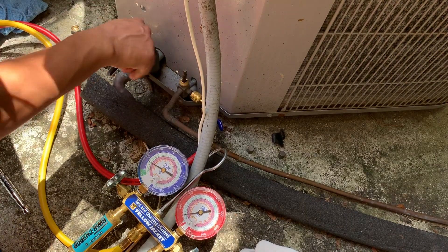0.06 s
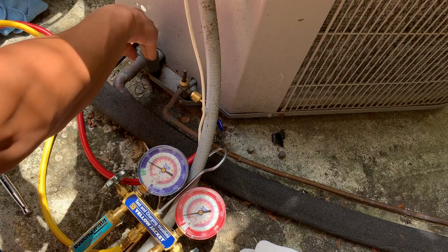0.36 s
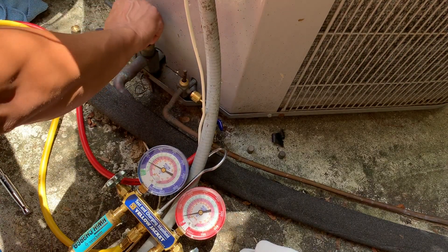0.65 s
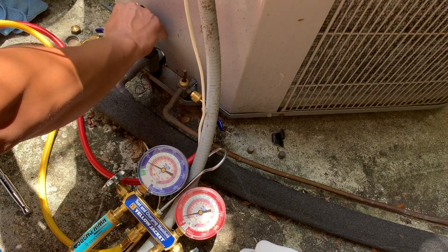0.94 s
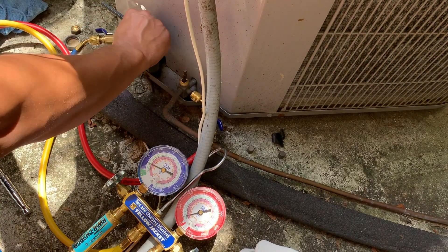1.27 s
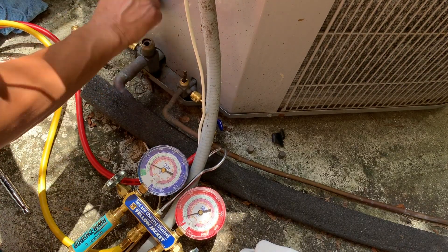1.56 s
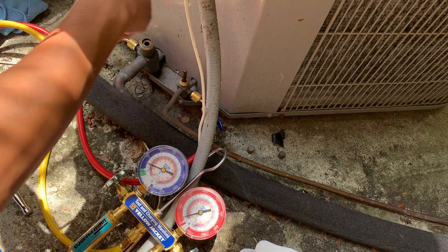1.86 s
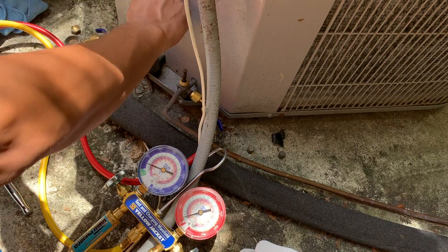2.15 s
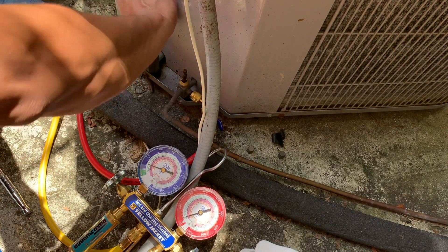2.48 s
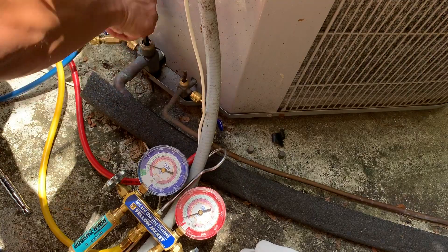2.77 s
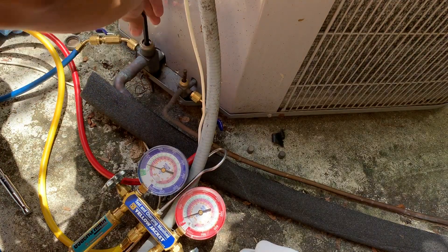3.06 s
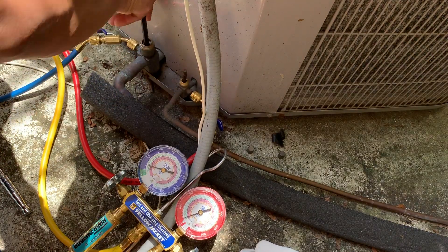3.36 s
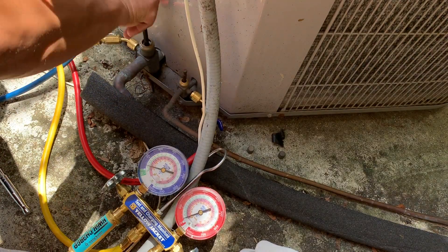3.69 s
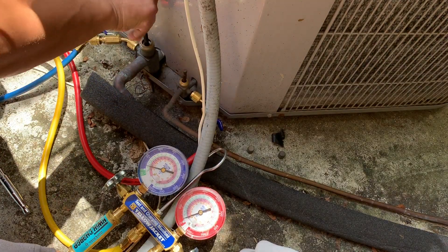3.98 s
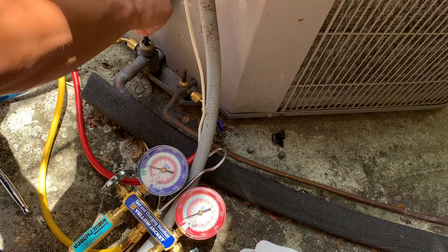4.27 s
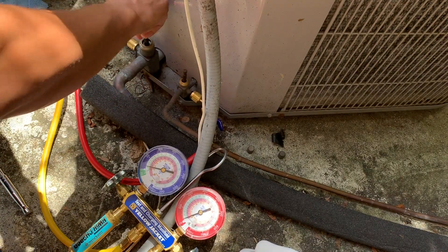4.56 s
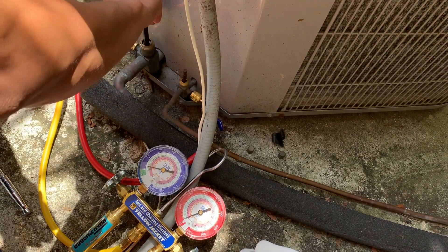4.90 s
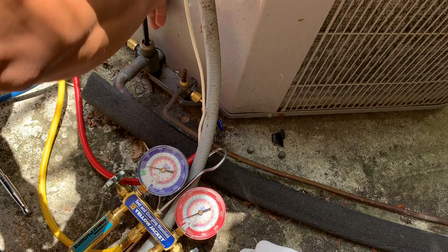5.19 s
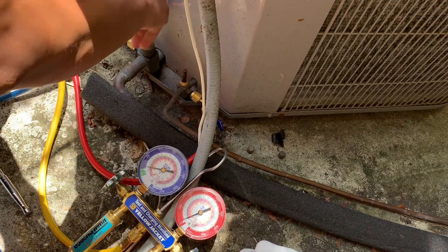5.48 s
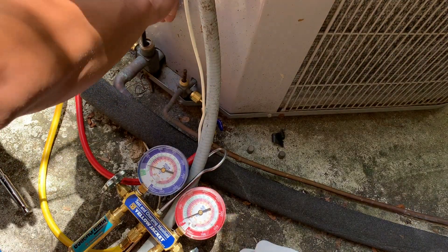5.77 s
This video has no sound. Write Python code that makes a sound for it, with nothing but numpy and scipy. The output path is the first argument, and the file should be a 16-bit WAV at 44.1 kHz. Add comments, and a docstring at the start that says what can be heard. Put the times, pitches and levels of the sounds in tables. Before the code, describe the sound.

Heard from just above its valves, an outdoor air conditioner runs with a buzzing compressor drone, a low fan hum, rushing air and a thin refrigerant hiss. A hand bumps the casing, then a metal part clanks sharply against it. Later a tool scrapes briefly and a soft thud follows. The drone carries on until all sound suddenly stops.

```python
"""The compressor of an outdoor air conditioner drones, heard from just above the service valves.
It knocks several times a turn; this periodic forcing gives harmonics that beat against the fan's tones.
Turbulent air rushes, the motor hums, and refrigerant hisses and sets the pipes ringing.
A hand at the valves bumps the casing, clanks a metal part against it and scrapes a tool.
Near the end all sound stops dead."""
import sys
import numpy as np
from scipy import signal
from scipy.fft import rfft, irfft
from scipy.io import wavfile
from scipy.ndimage import uniform_filter1d, map_coordinates

SR = 44100
rng = np.random.default_rng(int(sys.argv[2]) if len(sys.argv) > 2 else 0)


def unload_audio(sound):
    """Save the sound as a 16-bit wav file, at the path given as the first command line argument."""
    columns = np.transpose(np.atleast_2d(sound))
    # keep every value between -1 and 1, then stretch to whole-number steps
    steps = np.round(np.clip(columns, -1, 1) * 32767)
    wavfile.write(sys.argv[1], SR, steps.astype(np.int16))


N = 261954
FFT_SIZE = 2 ** 18
T, FREQS = np.arange(N) / SR, np.fft.rfftfreq(FFT_SIZE, 1 / SR)

SHAFT_HZ, BLADE_HZ, MAINS_HZ, TOP_HZ = 59.063, 55.71, 60, 15800
FIRST_BLADE_S, STOP_S = .0066, 5.477
PUFF_PLACE = 0.58  # fraction of the turn at which the gas puffs

# air through coil and grille: f/Hz, spectral level/dB
AIR_SPECTRUM = [(15, -76.5), (40, -59), (90, -59), (150, -62.5), (270, -60.5), (400, -65.5), (700, -60.5),
                (1050, -64), (1300, -70), (2200, -77), (3000, -80), (6000, -91), (16000, -110)]
# fan tones: multiple of the blade rate, level/dB
BLADE_HARMONICS = [(1, -22.5), (2, -36), (3, -55), (4, -39), (5, -66.5)]
# motor hum: multiple of the mains frequency, level/dB
HUM_HARMONICS = [(2, -39), (4, -50.5), (8, -54)]
# refrigerant in the valve: f/Hz, spectral level/dB
HISS_SPECTRUM = [(1500, -89.5), (3000, -87), (4000, -82.5), (4800, -79), (5900, -83), (7200, -74.5),
                 (8400, -74), (9400, -73), (10500, -81), (12000, -82), (13700, -82.5), (15500, -84.5)]
# swell of the hiss: t/s, gain/dB
HISS_SWELL = [(0, -5), (1, -3), (2.5, -1.5), (4, -0.7), (5.5, -0.5)]
# pipe resonances: f midway/Hz, bandwidth/Hz, level/dB, glide/(Hz/s), wander/Hz
PIPE_MODES = [(3529, 42, -67.5, 0, 10), (4215, 30, -73, -8.5, 8), (4540, 60, -75, 10.5, 10),
              (5008, 100, -71, 25, 25), (5220, 90, -76, 20, 30), (5470, 70, -77, -16, 30),
              (7070, 110, -75, -1.5, 40)]
# excitation of the pipes: t/s, gain/dB
PIPE_DRIVE = [(.3, -3), (1.0, -2), (1.7, -1.5), (2.3, 1), (3.1, 1), (3.7, 1), (5.4, 2.5)]
# bumps and scuffs: t/s, level/dB, half-duration/s, centre f/Hz
HANDLING = [(3.402, -25.5, 0.018, 58), (3.396, -28, 0.027, 280), (3.432, -27.5, 0.036, 640),
            (3.43, -46, 0.039, 11000), (4.768, -32, 0.035, 111)]
# blows on the casing: t/s, ring level/dB, cut-off f/Hz, clatter level/dB, clatter T60/s
IMPACTS = [(0.7700, -12.5, 690, -32, .05), (.7785, -23, 720, -35, .05), (.795, -24, 720, -34, .1),
           (1.6087, -15.5, 16960, -13.5, .028), (1.6117, -25, 15060, -21, 0.071),
           (1.6213, -23, 11000, -21, 0.12), (1.6325, -17.5, 2100, -18, 0.05),
           (1.6365, -18.5, 2000, -19, 0.051), (1.6515, -23, 3000, -27, .1), (1.668, -27, 2000, -30, .2)]
# modes of casing and valves: f/Hz, level/dB, T60/s, build-up time/s
CASING_MODES = [(515, -7, .16, .0005), (616, -4, 0.041, .0005), (707, 1.5, 0.062, .0005),
                (826, -3.5, .06, .0005), (885, -1.5, 0.054, .0005), (945, -4, .1, .0005),
                (998, -5.5, .23, .001), (1153, -6.5, .16, .002), (1457, -2.5, 0.33, .06),
                (1530, -13, .3, .04), (1620, -8, .1, .0005), (1733, -11.5, .1, .0005),
                (1864, -8, .1, .0005), (2020, -10.5, .15, .0005), (2126, -11.5, .2, .005),
                (2530, -22, .18, .0005), (2891, -17, .33, .004), (4194, -21, .35, .002),
                (4740, -14.5, .089, .0005), (5250, -16, .1, .0005), (6260, -17, .1, .0005),
                (7150, -8.5, .13, .0005)]
# colour of the clatter: f/Hz, gain/dB
CLATTER_COLOUR = [(300, -7), (550, -2), (850, 4), (1400, -3), (1950, 1), (2600, -3), (3400, -5),
                  (5000, 1.5), (6500, .5), (15000, -1.5)]
# knocks that set the harmonics' phases: place/turn, centre f/Hz, bandwidth/Hz, weight/dB
KNOCKS = [(.68, 51, 90, 2), (.16, 640, 315, -5), (.73, 435, 303, -2), (.58, 700, 325, -3.5),
          (.14, 980, 383, -4), (.45, 1004.5, 515, 4), (.75, 940, 460, 4.5), (.24, 1533, 690, -4.5),
          (.56, 1507, 397, -1), (.12, 2100, 450, -5), (.55, 2250, 560, 1.5), (.74, 2300, 705, -3),
          (.52, 4200, 2200, -22)]
# low harmonics of the compressor shell: shaft order, relative level/dB, side minus mid/dB
SHELL_HARMONICS = [(1, -9.5, -33), (2, -26, -15.5), (3, -12, -16), (4, -17, -25.5), (5, -14.5, -32.5),
                   (6, -21.5, -18), (7, -11, -14.5), (8, -20.5, -7), (9, -16.5, -8.5), (10, -16, -10),
                   (11, -7, -15.5), (12, -11.5, -18), (13, -24.5, -6), (14, -25, -3), (15, -15, -5),
                   (16, -13, -13), (17, -15.0, -8), (18, -14, -4.5), (19, -10, -16.5), (20, -25, -0.5),
                   (21, -20, -8), (22, -29, -15.5), (23, -16.5, -12), (24, -15.0, -17), (25, -18, -13),
                   (26, -18, -1.5), (27, -24.5, 3), (28, -21.5, -5.5), (29, -33, -5), (30, -36.5, -7.5),
                   (31, -23, -19), (32, -38, 2), (33, -40, 13.5), (34, -28.5, 15), (35, -16, -4),
                   (36, -19, 1.5), (37, -16.5, -11), (38, -21, 0.5), (39, -27, 8.5), (40, -30.5, -3),
                   (41, -26, -5), (42, -19.5, -16.5), (43, -26, -6), (44, -34, 5), (45, -32.5, -7),
                   (46, -29.5, -3), (47, -42, 13), (48, -38, 15), (49, -32, 10.5), (50, -32, -1)]
# envelope of its upper harmonics: f/Hz, level/dB
BUZZ_ENVELOPE = [(3000, -65.5), (3200, -59), (3350, -67), (3520, -61), (3680, -65.5), (4150, -65),
                 (4550, -62), (4800, -65), (5400, -68.5), (5900, -67.5), (6800, -64.5), (7300, -71),
                 (9000, -72)]
# upper harmonics that stand out: shaft order, level/dB
BUZZ_PEAKS = [(60, -55), (66, -59), (72, -58.5), (77, -56), (91, -60)]
# bands of the drone that grow or fade: centre f/Hz, half-width/Hz, slope/(dB/s)
BAND_DRIFT = [(461, 53, 4), (860, 71, 2), (1000, 30, -2), (1447, 65, -1.7), (1704, 80, 2), (1840, 40, 0)]
# harmonics that swell or sink for a while: t/s, half-duration/s, shaft order, gain/dB
HARMONIC_SWELLS = [(2.25, 1.2, 11, 3.5), (4.3, 0.3, 11, -1.5), (3.1, 0.62, 19, 3), (5.26, 0.66, 16, 7),
                   (4.05, 0.48, 16, -4), (4.04, .35, 17, -5), (4.85, .7, 18, 3.5), (3.2, 0.44, 15, -4),
                   (.6, .9, 21, 5), (1.8, 1.4, 27, 6.5), (4.8, 1.1, 27, -5), (3.4, .6, 28, 5.5),
                   (4.2, .6, 41, 7), (.8, .8, 41, -5), (4.2, 0.56, 46, 8.5), (1, 1.2, 46, -10),
                   (1.2, .6, 49, 5), (2.45, 0.54, 60, 3), (1.5, .4, 72, 4.5)]
# metallic rasp of the drone: t/s, gain/dB
RASP_GAIN = [(0, -2.5), (2.6, 0), (3.3, -4.5), (4.0, 1), (4.7, 0), (4.85, -1), (5.45, -3.5)]
# stereo width: f/Hz, side minus mid/dB
STEREO_WIDTH = [(60, -19.5), (200, -20.5), (380, -12.5), (700, -9.5), (1290, -5.5), (2380, -3),
                (4400, -2.5), (8500, -1.5), (13000, -4.5)]
# stereo balance: f/Hz, left minus right/dB
BALANCE = [(60, -1.5), (110, 2), (200, 0), (380, 0.5), (700, 0.5), (1290, 1), (2380, 4), (3000, -0.5),
           (4400, 0.5), (5700, -5), (7000, 0.5), (15000, -1)]


def undb(db):
    """Amplitude ratio of a level in decibels."""
    return np.exp(np.asarray(db) * np.log(10) / 20)


def at(table, hz):
    """Interpolation of a spectrum on a logarithmic frequency axis."""
    f, value = np.transpose(table)
    return np.interp(np.log(np.maximum(hz, 1)), np.log(f), value)


def bell(x, centre, width):
    """Gaussian curve, 1 at its centre."""
    return np.exp(-((x - centre) / width) ** 2)


def resonance(f, hz, width):
    """Complex response of a damped oscillator, 1 at resonance."""
    return 1j * f * width / (hz ** 2 - f ** 2 + 1j * f * width)


def moving_resonance(x, hz, width):
    """Forced response of a damped oscillator whose natural frequency follows hz."""
    carrier = np.exp(2j * np.pi * np.cumsum(hz) / SR)
    pole = np.exp(-np.pi * width / SR)
    return 2 * np.real(carrier * signal.lfilter([1 - pole], [1, -pole], x / carrier))


def lowpass(x, hz, order=2):
    """Maximally flat low-pass filter."""
    return signal.sosfilt(signal.butter(order, min(hz, SR / 2 - 1000), fs=SR, output="sos"), x)


def noise(gain):
    """Gaussian noise of the given amplitude per root hertz."""
    bins = rng.standard_normal(len(FREQS)) + 1j * rng.standard_normal(len(FREQS))
    return irfft(bins * gain)[:N] * np.sqrt(SR * FFT_SIZE) / 2


def walk(rate_hz):
    """Smooth random fluctuation with a standard deviation near 1."""
    size = int(SR / rate_hz)
    steps = np.repeat(rng.standard_normal(N // size + 2), size)
    return uniform_filter1d(steps, size)[rng.integers(size):][:N] * np.sqrt(3 / 2)


def harmonics(table, hz, crest_s):
    """Superposition of steady harmonics, in phase at crest_s."""
    phase = 2 * np.pi * hz * (T - crest_s)
    return np.sqrt(2) * sum(undb(db) * np.cos(round(k) * phase) for k, db in table)


def fan_air(gust_db=1.0, chop=0.092, body_hz=420, body_width_hz=220, body_db_per_s=0.5):
    """Turbulence makes broadband noise, modulated by each blade; its low body slowly fills out."""
    blade = np.cos(2 * np.pi * BLADE_HZ * (T - FIRST_BLADE_S))
    gain, share = undb(at(AIR_SPECTRUM, FREQS)), bell(FREQS, body_hz, body_width_hz)
    body = noise(gain * np.sqrt(share)) * undb(body_db_per_s * (T - STOP_S / 2))
    rest = noise(gain * np.sqrt(1 - share))
    return (body + rest) * undb(gust_db * walk(12)) * (1 + chop * blade)


def fan_tones():
    """Periodic blade passage radiates harmonics of the blade rate."""
    return harmonics(BLADE_HARMONICS, BLADE_HZ, FIRST_BLADE_S)


def motor_hum():
    """Forced vibration of the motor at even multiples of the mains frequency."""
    return harmonics(HUM_HARMONICS, MAINS_HZ, 0)


def gas_pulse():
    """Pulsation of the gas flow, cresting once a turn."""
    return np.cos(2 * np.pi * (SHAFT_HZ * T - PUFF_PLACE))


def valve_hiss(pulsing=0.17, ring_db=-10, ring_t60_s=0.037, scatter_db=-14, flicker_db=0.72, lag_s=.000143):
    """Jet noise, coloured by tube resonance, reaches the right first. Gives left and right spectra."""
    age = T[:SR // 10]
    ring = rng.standard_normal(len(age)) * undb(-60 * age / ring_t60_s)
    ring_spectrum = rfft(ring / np.linalg.norm(ring), FFT_SIZE)
    tube = (1 + undb(ring_db) * ring_spectrum) / np.hypot(1, undb(ring_db))
    flow_db = np.interp(T, *np.transpose(HISS_SWELL)) + flicker_db * walk(12)
    flow = undb(flow_db) * (1 + pulsing * gas_pulse())
    gain = undb(at(HISS_SPECTRUM, FREQS)) * tube * np.sqrt(SR / 2)
    jet, *scattered = rfft(rng.standard_normal((3, N)) * flow, FFT_SIZE) * gain
    delayed = jet * np.exp(-2j * np.pi * FREQS * lag_s)
    return np.array([delayed, jet]) + undb(scatter_db) * np.array(scattered)


def pipe_chatter(puff_db=-66.5, puff_hz=1600, puff_width_hz=1300, sharpness=6, patchy_db=1.1):
    """Forced resonance: a gas puff each turn rings the pipes, whose pitches wander with the flow."""
    pulse = gas_pulse()
    shake = np.exp(pulse - 1)
    drive = noise(0.75) * shake / np.sqrt(np.mean(shake ** 2))
    drive *= undb(np.interp(T, *np.transpose(PIPE_DRIVE)) + patchy_db * walk(12))
    chatter = 0
    for hz, width, db, glide, wander in PIPE_MODES:
        pitch = hz + glide * (T - STOP_S / 2) + wander * walk(6)
        chatter += undb(db) * moving_resonance(drive, pitch, width)
    puff = noise(undb(puff_db) * abs(resonance(FREQS, puff_hz, puff_width_hz)) ** 2)
    return chatter + puff * np.exp(sharpness * (pulse - 1))


def hand_bumps(relative_width=0.6):
    """Heavily damped contacts: thuds and scuffs are short bursts of band noise."""
    out = 0
    for s, db, length, hz in HANDLING:
        thud = noise(abs(resonance(FREQS, hz, relative_width * hz)) ** 2)
        out += undb(db) * thud / thud.std() * bell(T, s, length)
    return out


def casing_ring(scatter_rad=.3):
    """Free vibration of struck sheet metal: wide panels build up late; soft blows excite only low modes."""
    out, age = np.zeros(N), T[:SR // 2]
    for s, ring_db, cutoff_hz, _, _ in IMPACTS:
        ring = 0
        for hz, db, t60, build in CASING_MODES:
            envelope = undb(db - 60 * age / t60) * (1 - np.exp(-age / build))
            ring += envelope * np.sin(2 * np.pi * hz * age + scatter_rad * rng.standard_normal())
        start = int(s * SR)
        out[start:start + len(age)] += undb(ring_db) * lowpass(ring, cutoff_hz, order=4)
    return out


def part_clatter(highpass_hz=450, lowest_mode_hz=600, rough_db=-2, count=140):
    """Impact excites the dense modes of a loose metal part; the harder the contact, the brighter."""
    out, age = np.zeros(N), T[:SR // 2]
    modes = lowest_mode_hz + (TOP_HZ - lowest_mode_hz) * (np.arange(count) + rng.random(count)) / count
    metal = np.sin(2 * np.pi * modes[:, None] * T[:SR * 3 // 4]).sum(axis=0) * np.sqrt(2 / count)
    for s, _, cutoff_hz, db, t60 in IMPACTS:
        grit = metal[rng.integers(SR // 50, SR // 4):][:len(age)]  # new mode phases at each blow
        grit = lowpass(grit + undb(rough_db) * rng.standard_normal(len(age)), cutoff_hz)
        grit = grit - lowpass(grit, highpass_hz, order=1)
        start = int(s * SR)
        out[start:start + len(age)] += undb(db - 60 * age / t60) * grit / grit.std()
    return irfft(rfft(out, FFT_SIZE) * undb(at(CLATTER_COLOUR, FREQS)))[:N]


def shell_drift(times, orders, rasp_hz=2100, rasp_width_hz=390):
    """Slow amplitude modulation of bands and single harmonics, in dB."""
    hz = orders * SHAFT_HZ
    drift = (times - STOP_S / 2) * sum(slope * bell(hz, f, width) for f, width, slope in BAND_DRIFT)
    whine = sum(db * bell(times, s, span) * (orders == round(k)) for s, span, k, db in HARMONIC_SWELLS)
    rasp = np.interp(times, *np.transpose(RASP_GAIN)) * bell(hz, rasp_hz, rasp_width_hz)
    return drift + whine + rasp


def shell_rattle(turns, hz, scatter_db=.9, width_hz=420):
    """Random modulation, in dB: each turn rattles three bands of the shell harder or softer."""
    bands = np.array([bell(hz, f, width_hz) for f in (1450, 2150, 2800)])
    return scatter_db * rng.standard_normal((turns, len(bands))) @ bands


def shaft_cycles(levels_db, phases, size=4096):
    """Harmonic synthesis: each row of levels gives one turn's waveform, which blends into the next."""
    spectra = np.pad(undb(levels_db) * np.exp(1j * phases), ((0, 0), (1, 0)))
    waves = irfft(spectra, size) * size / np.sqrt(2)
    turn = SHAFT_HZ * T
    return map_coordinates(waves, [turn, turn % 1 * size], order=1, mode="grid-wrap")


def compressor(shell_db=-25.0, waver_db=1.4, waver_hz=2200, flutter_db=0.44, smear_hz=4500):
    """Periodic knocks give a line spectrum, weighted by the radiating shell. Gives mid and side."""
    orders = np.arange(1, 150)
    hz = orders * SHAFT_HZ
    knocks = sum(undb(db) * resonance(hz, f, width) ** 2 * np.exp(-2j * np.pi * orders * place)
                 for place, f, width, db in KNOCKS)
    # high partials take many paths through the metal and arrive smeared and uneven
    phases = np.angle(knocks) + (hz / smear_hz) ** 2 * rng.standard_normal(len(hz))
    line_db = at(BUZZ_ENVELOPE, hz) + rng.uniform(-3, 3, len(hz))
    side_db = at(STEREO_WIDTH, hz) + rng.uniform(-5, 5, len(hz))
    shell = np.array(SHELL_HARMONICS)
    line_db[:len(shell)] = shell[:, 1] + shell_db
    side_db[:len(shell)] = shell[:, 2]
    for k, db in BUZZ_PEAKS:
        line_db[orders == round(k)] = db
    times = np.arange(0, N / SR, 1 / SHAFT_HZ)[:, None]  # one row a turn
    # every line wavers on its own, the high ones most
    waver = rng.standard_normal((len(times), len(hz)))
    waver = uniform_filter1d(uniform_filter1d(waver, size=24, axis=0), size=12, axis=0)
    waver *= waver_db * np.clip(hz / waver_hz, 1, 3) / waver.std()
    levels = line_db + shell_drift(times, orders) + waver + shell_rattle(len(times), hz)
    mid = shaft_cycles(levels, phases)
    side = shaft_cycles(levels + side_db, phases - np.pi / 2)
    return np.array([mid, side]) * undb(flutter_db * walk(59))  # no two turns are equally strong


def scene(diffuse=0.652):
    """Direct sound differs in phase left and right; noise scattered by slab and wall is incoherent."""
    drone_mid, drone_side = rfft(compressor(), FFT_SIZE)
    tonal = rfft(fan_tones() + motor_hum() + casing_ring(), FFT_SIZE)
    direct, scattered = (rfft(fan_air() + pipe_chatter() + part_clatter() + hand_bumps(), FFT_SIZE)
                         for _ in range(2))
    mid = drone_mid + tonal + direct
    quadrature = -1j * (tonal + np.sqrt(1 - diffuse) * direct)
    side = drone_side + undb(at(STEREO_WIDTH, FREQS)) * (quadrature + np.sqrt(diffuse) * scattered)
    ear = np.array([[1], [-1]])  # left, right
    balance = undb(ear * at(BALANCE, FREQS) / 2)
    return irfft((mid + ear * side + valve_hiss()) * balance)[:, :N]


def record(dry):
    """Gating and band limiting: the sound stops dead, and a steep low-pass cuts the top."""
    top_cut = signal.ellip(8, .2, 80, TOP_HZ, fs=SR, output="sos")
    return signal.sosfilt(top_cut, dry * (T < STOP_S))


dry = scene()
out = record(dry)
unload_audio(out)
```